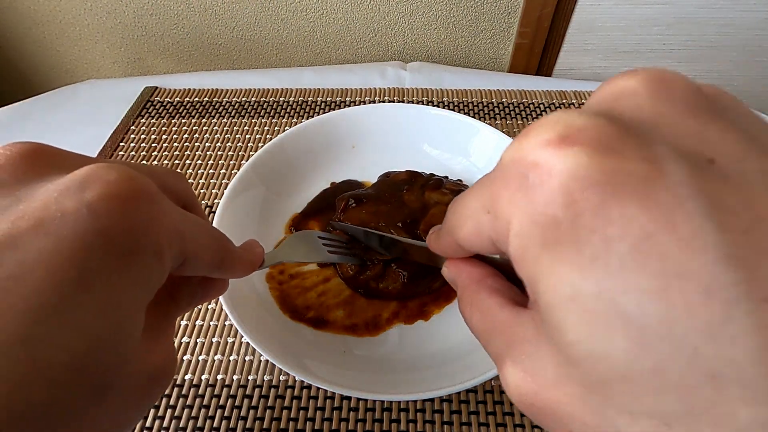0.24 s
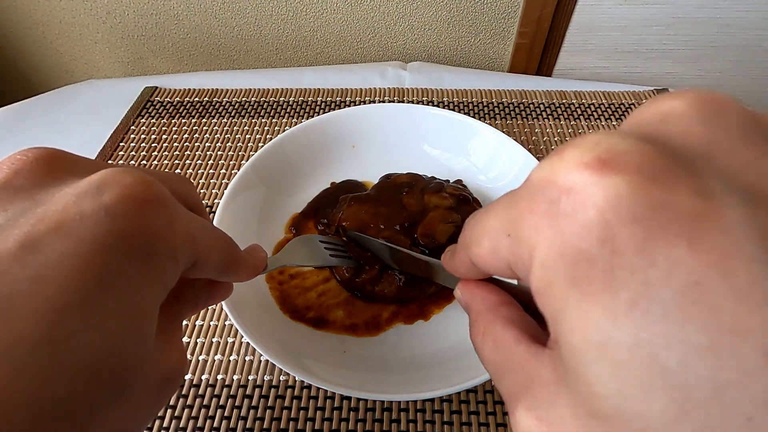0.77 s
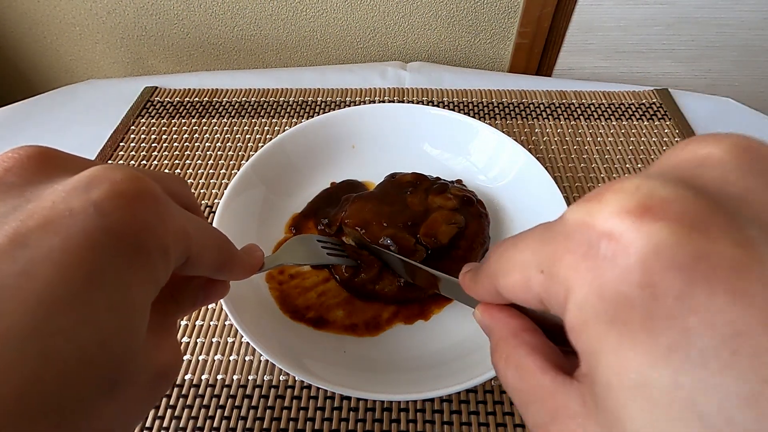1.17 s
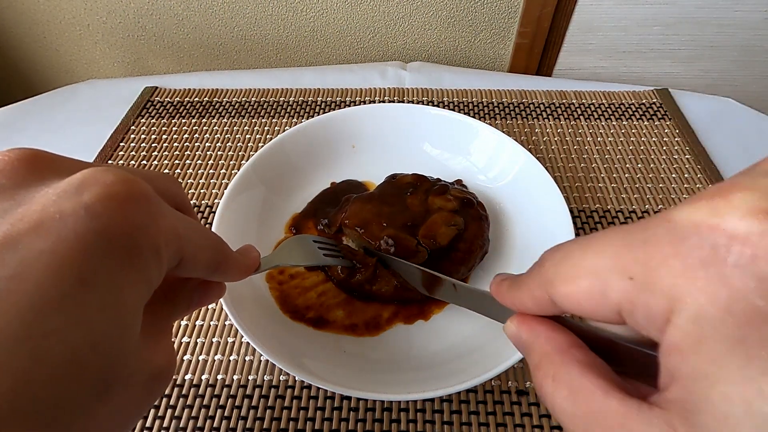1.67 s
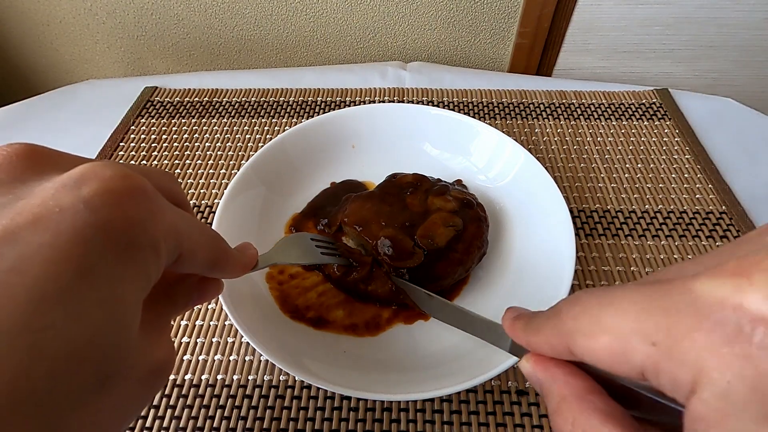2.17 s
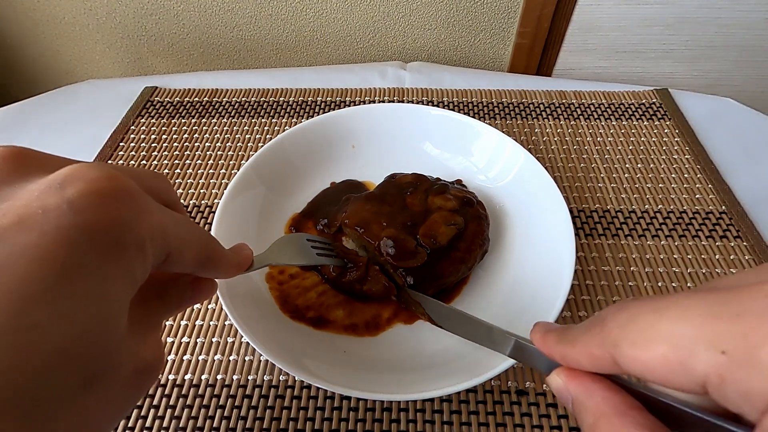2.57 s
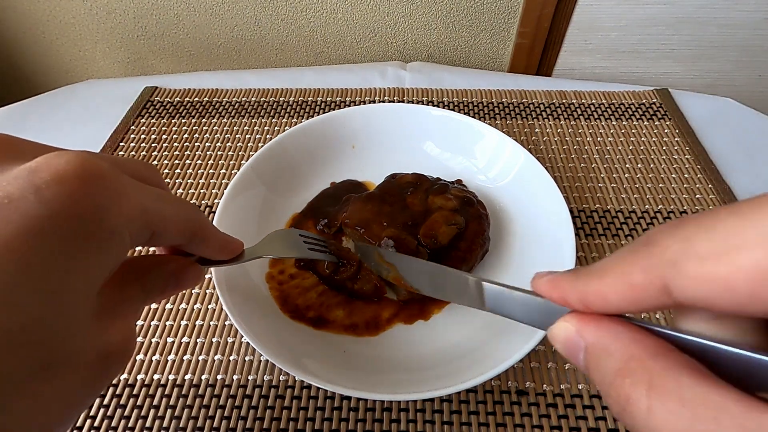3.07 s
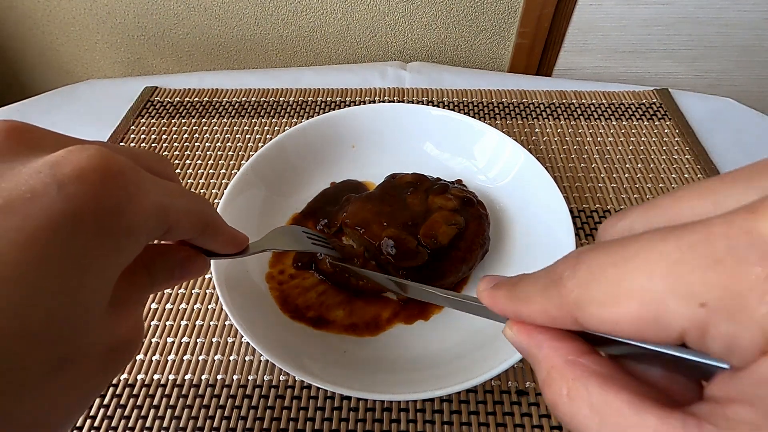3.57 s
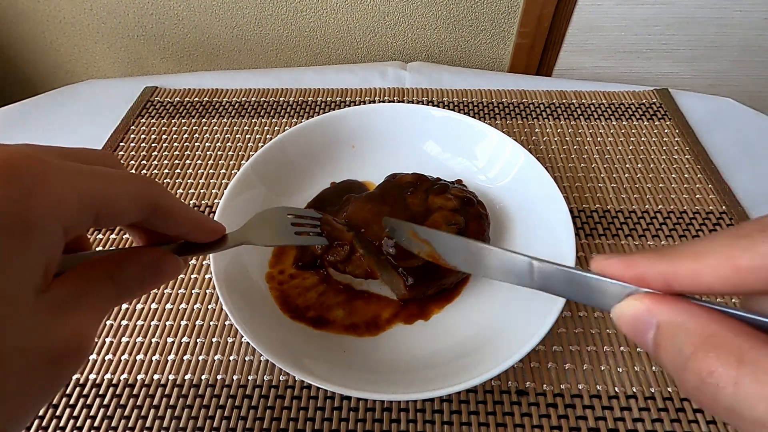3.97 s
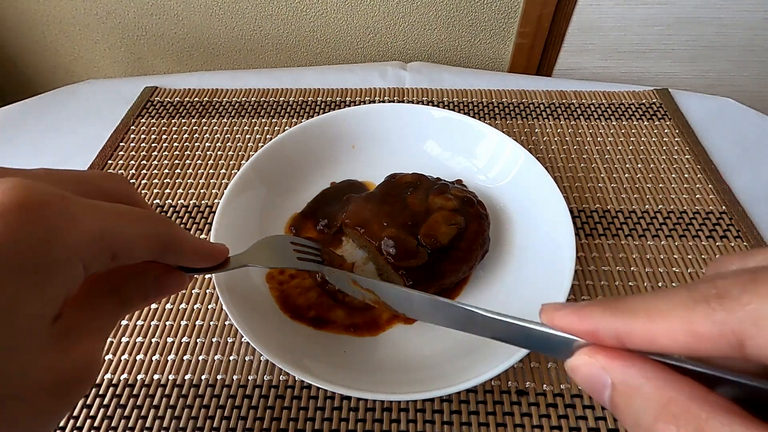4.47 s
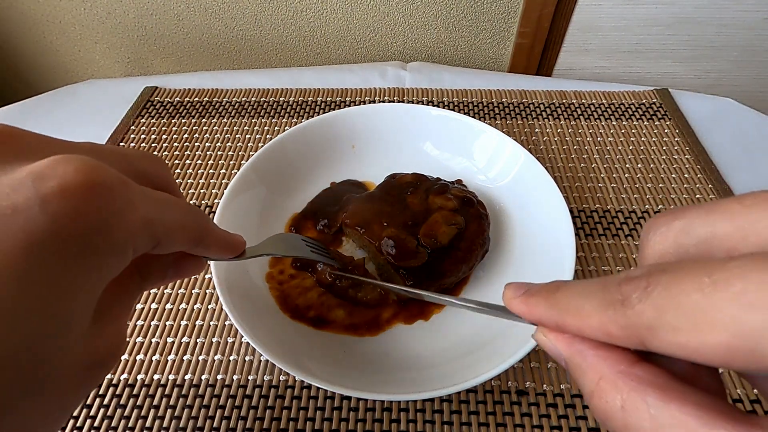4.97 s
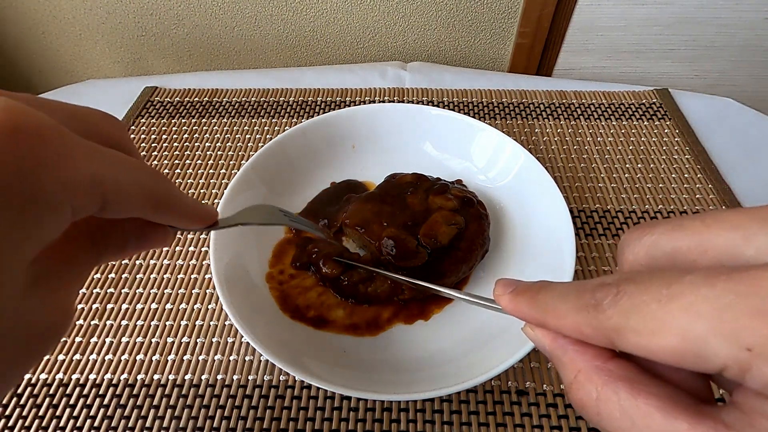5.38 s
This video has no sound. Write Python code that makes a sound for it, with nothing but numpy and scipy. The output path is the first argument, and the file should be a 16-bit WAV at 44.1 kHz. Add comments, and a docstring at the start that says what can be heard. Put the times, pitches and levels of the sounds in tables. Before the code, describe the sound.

Close up in a small quiet room, a table knife saws through sauced meat on a ceramic plate. Short uneven scrapes mix with wet clicks, sharp plate knocks and low table thumps for about three seconds. Small rough squeaks come near the end of the cut, then the knife and fork clink and slide softly, with longer quiet gaps.

```python
"""Knife and fork on a plate

Close by in a small quiet room, as at one microphone: a steel table knife saws sauced meat on a ceramic plate.
Strokes rasp on the glaze, crackle through wet fibres and sway the table; knocks strike plate resonances.
Rough squeaks glide in pitch; later knife and fork clink and slide along each other.
Rubbing is random tiny slips through resonators, blows are short bursts, and low sways are shaped noise."""
import sys
import numpy as np
from scipy import signal
from scipy.fft import rfft, irfft, next_fast_len
from scipy.io import wavfile
from scipy.ndimage import uniform_filter1d, minimum_filter1d

SR = 44100
rng = np.random.default_rng(int(sys.argv[2]) if len(sys.argv) > 2 else 0)


def to_wav(sig):
    """Store sig (one row per channel, or 1-D mono) as 16-bit WAV at the path in sys.argv[1].

    Samples outside -1..1 are clipped; the rate is SR.
    """
    pcm = np.clip(np.atleast_2d(sig), -1, 1) * 32767
    pcm = np.round(pcm).astype(np.int16)
    wavfile.write(sys.argv[1], SR, pcm.T)  # frames by channels


N = 248709
TIME = np.arange(N) / SR
BLOW_TIME = TIME[:SR]   # one second for each blow and its ring

# Event levels below are in dB before each layer's own trim.
# Strokes of the knife. Each row: start in seconds, length in seconds, swell from start to end in dB,
# rasp on the plate in dB, wet crackle in dB, table sway in dB, plate rocking in dB.
STROKES = [(0.15, 0.15, 12, -67, -72, -28.5, -61.5), (0.388, 0.014, -3, -56.5, -53.5, -34.5, -72.5),
           (0.562, .065, -2, -62, -61.5, -32.5, -57), (0.641, 0.068, -8.5, -51.5, -64, -32, -32),
           (0.745, .048, 7.5, -58.5, -64.5, -34, -43), (0.941, 0.08, 9.5, -56.5, -61.5, -32, -32),
           (1.057, 0.052, 10, -51.5, -57, -26, -40), (1.28, 0.082, 8, -50, -54, -25, -30.5),
           (1.354, 0.12, -6.5, -49.5, -58, -26, -50), (1.495, 0.032, 3.5, -70, -70, -29.5, -51),
           (1.62, 0.05, 16, -60, -51, -46, -43.5), (1.678, 0.1, -11.5, -47.5, -57.5, -34.5, -36),
           (1.933, 0.0611, 4, -54.5, -54, -35, -45), (2.035, 0.034, 1, -53, -54.5, -33, -47.5),
           (2.253, .045, -0.5, -75, -66, -44, -60), (2.311, .040, 1, -72, -83, -34.5, -49),
           (2.371, .020, 0, -87, -65.5, -45, -67.5), (2.551, 0.098, -8.5, -68, -75, -30, -50.5),
           (2.729, 0.034, -7.5, -60, -81, -40.5, -47), (2.798, 0.049, -3, -75, -79, -31, -58),
           (2.921, 0.046, -7, -48, -60, -23, -31.5)]
# Light pushes on the table as the hands shift. Each row: start in seconds, length in seconds,
# swell in dB, level in dB.
NUDGES = [(0.0, 0.019, 2.5, -40), (3.355, 0.094, -13, -47), (3.545, 0.032, 3, -60.5),
          (4.031, 0.015, -1, -49), (4.163, 0.1, -3.5, -60), (4.787, 0.034, -0.5, -47),
          (4.872, 0.088, 5, -52.5), (5.233, 0.072, -12.5, -45), (5.538, 0.017, 0, -44.5)]
# The plate is shoved against the table. Each row: time in seconds, level in dB.
THUMPS = [(0.641, -14), (0.874, -37.5), (1.019, -15), (1.355, -31), (1.676, -24), (1.968, -19),
          (2.693, -36.5), (2.913, -23.5), (5.224, -36)]
# Weight of the arms on the table. Each row: time in seconds, level in dB.
LEANING = [(0.0, -63.5), (0.35, -48), (0.66, -41.5), (1.6, -41), (2.08, -34.5), (2.24, -44), (2.95, -42.5),
           (3.25, -63), (4.4, -76), (5.64, -68)]
# Fibres and sauce snap. Each row: time in seconds, peak level in dB, pitch in Hz.
SNAPS = [(0.097, -58.5, 7300), (0.2496, -53.5, 7850), (0.3105, -49.5, 7000), (0.3357, -54, 6740),
         (0.5214, -46, 7400), (0.5347, -47.5, 7350), (0.6005, -47.5, 7000), (0.9285, -54.5, 6090),
         (1.2312, -58.5, 4970), (1.286, -34, 7250), (1.296, -39, 6880), (1.626, -44, 6670),
         (1.9078, -53.5, 4800), (1.997, -57.5, 7300), (2.2777, -49, 7700), (2.5217, -46.5, 6930),
         (2.546, -48, 5545), (5.359, -54, 7560), (5.3892, -55.5, 5400)]
# Blade on plate. Each row: time in seconds, then level in dB of the low, middle, upper middle and
# high resonances.
KNOCKS = [(0.636, -32, -40.5, -36, -34), (0.869, -56.5, -56, -79, -59), (0.946, -57.5, -56.5, -78, -64),
          (1.016, -43.5, -39, -58, -55), (1.073, -54, -51, -66.5, -52.5), (1.2711, -52, -48.5, -62, -50.5),
          (1.3491, -27.5, -22.5, -28, -26.5), (1.453, -59, -50, -61, -55), (1.4611, -66, -46.5, -61.5, -52),
          (1.674, -28, -25.5, -31.5, -31.5), (2.302, -56.5, -55.5, -66, -46),
          (2.6909, -52.5, -44, -73.5, -82), (2.7171, -54, -47.5, -86, -78),
          (2.9093, -32.5, -17.5, -40, -33), (5.2154, -60.5, -55, -71, -62.5)]
# Thick fibres tear. Each row: start in seconds, length in seconds, swell in dB, level in dB.
TEARS = [(0.743, 0.039, 18.5, -65.5), (0.94, 0.087, 6, -55.5), (1.04, 0.056, 3.5, -59),
         (4.831, 0.031, 2, -61.5)]
# The tip sticks and slips. Each row: loudest moment in seconds, rise in seconds, fall in seconds,
# pitch at that moment in Hz, glide in octaves per second, level in dB.
SQUEAKS = [(2.560, 0.0035, 0.012, 3094, -4.5, -53), (2.620, 0.0073, 0.0028, 3060, -5, -57.5),
           (2.640, .012, 0.018, 3000, 3.5, -58), (2.742, 0.0082, 0.0077, 3040, 5, -45.5),
           (2.837, .011, 0.0046, 3050, -5, -50), (2.900, .002, 0.0037, 3094, -6, -51.5),
           (3.876, 0.0034, 0.009, 3620, -6, -62), (3.876, 0.0055, .007, 2720, -2, -61),
           (3.913, 0.018, 0.011, 2540, -1, -55), (4.847, 0.019, 0.013, 4240, 1, -50.5)]
# Knife on fork. Each row: time in seconds, then level in dB of the low, middle, upper middle and
# high resonances.
CLINKS = [(3.3385, -48, -59.5, -57, -52.5), (3.533, -63, -68, -63, -57), (3.8473, -61.5, -58.5, -67, -48.5),
          (4.7709, -48, -47, -49.5, -53), (4.825, -62, -65, -56, -78), (5.1821, -57, -58, -62, -48)]
# The blade slides along the fork. Each row: start in seconds, length in seconds, swell in dB,
# steel ring in dB, rasp on the plate in dB.
SLIDES = [(3.376, 0.03, -0.5, -57.5, -57), (3.53, .012, 7, -52.5, -64), (3.859, 0.022, -8.5, -60.5, -72),
          (3.891, 0.031, 12, -55, -80), (4.823, 0.04, 5, -60, -50), (4.906, 0.0034, -4, -69, -56.5),
          (4.947, 0.0063, -11, -75, -67), (5.27, 0.13, 7, -70, -72.5)]
# The blade slips off the last tine. One row: time in seconds, level in dB.
SLIP_OFF = (3.920, -54.5)

# Damped resonances of plate and blade. Each row: pitch in Hz, width in Hz of each resonator pass,
# level when struck in dB, level when rubbed in dB.
PLATE = [(700, 410, -10, -12), (1298, 350, -2.5, 2), (1703, 380, -3, 3.5), (2320, 520, -19, -3),
         (2974, 260, 9, -1.5), (3250, 240, 5, -4), (3494, 323, 0.5, -10.5), (3870, 470, -6.5, -16.5),
         (4332, 650, -9.5, -10), (5572, 650, -12, -16), (6120, 360, -5, -14), (7280, 540, -2, -14),
         (8586, 330, -24, -28), (11591, 650, -27, -35)]
PLATE_STRUCK = [(hz, width, struck_db) for hz, width, struck_db, _ in PLATE]
PLATE_RUBBED = [(hz, width, rubbed_db) for hz, width, _, rubbed_db in PLATE]
# Resonances of knife against fork. Each row: pitch in Hz, width in Hz of each pass, level in dB.
STEEL = [(1210, 370, -12), (1820, 300, -12), (2560, 700, -12), (3330, 400, -15), (4120, 410, -8.5),
         (4820, 420, -1), (5360, 260, -0.5), (5860, 140, -1), (6550, 950, 0), (7490, 560, 5),
         (8240, 180, -11.5), (9090, 810, -11.5), (10650, 680, -13), (11600, 550, -15), (12780, 500, -21),
         (13280, 440, -19)]
# Resonances at which wet fibres click. Each row: pitch in Hz, width in Hz of each pass, level in dB.
WET = [(2800, 500, -6), (5020, 430, -5), (6274, 800, -6), (7280, 820, 0), (8030, 420, -11.5),
       (10200, 1740, -23), (12606, 1500, -29)]
# Limits of the four resonance groups of a blow. Each row: lowest pitch in Hz, highest pitch in Hz.
RING_BANDS_HZ = [(500, 2400), (2400, 3700), (3700, 5000), (5000, 15000)]
# Free ringing of the plate. Each row: pitch in Hz, level in dB, t60 in seconds.
PLATE_RING = [(216, -4.5, 1), (657, -14, 0.86), (1280, -11, .13), (1637, -2, .18), (2900, -5.5, .15),
              (3192, -2.5, 0.15), (3370, -5, 0.24), (3870, -11, .19), (4210, -17, .18), (5120, -19, .18),
              (5502, -15.5, .19), (5840, -18.5, .17), (7305, -21, .18), (11420, -30.5, 0.11)]
# Free ringing of the knife. Each row: pitch in Hz, level in dB, t60 in seconds.
STEEL_RING = [(2266, -12, .08), (4554, -9, .09), (5250, -8, .06), (5780, 0, .09), (7480, -20, .25),
              (7560, -2, .07), (9260, -19, .12), (11400, -17, .06), (13520, -20, .04)]
# Table with the plate on it. Each row: pitch in Hz, level in dB, t60 in seconds.
TABLE = [(96.88, -1.5, 0.22), (102, 2, 0.11), (126.25, -1.5, 0.15), (218.3, -16.5, 0.085),
         (217.7, -28.5, 1), (219.8, -12, 0.086)]
# Spectrum of the swaying table. Each row: frequency in Hz, relative level in dB per Hz.
SWAY = [(35, -37.5), (55, -11), (70, -11.5), (86, 5.5), (105, -16.5), (120, -10), (136, -18), (160, -29.5),
        (200, -39)]
# Spectrum of the rocking plate. Each row: frequency in Hz, relative level in dB per Hz.
ROCKING = [(100, -25), (122, -8), (136, 1.5), (148, -5.5), (165, -24.5), (188, -9.5), (205, -6.5),
           (216, 1.5), (229, -6.5), (241, -5), (275, -29.5), (350, -44.5), (600, -46.5), (1000, -62)]
# Spectrum of the room at rest. Each row: frequency in Hz, relative level in dB per Hz.
ROOM_TONE = [(25, -0.5), (62, 0.5), (100, -13), (150, -9.5), (200, -2.5), (310, -14.5), (420, -14.5),
             (700, -22.5), (1250, -13), (2000, -21), (4000, -33), (7700, -36.5), (9500, -46.5),
             (14500, -46)]

CUT_THROUGH_S = 2.8    # the piece is cut through
ROOM_TONE_DB = -66.5
HUM_DB = -16           # relative to the rocking that drives it
SWAY_EVEN_S = .035
WANDER_DB = 3.5        # spread of each resonance as the contact travels
FADE_SHAPE = .8        # below 1, a fade is quick at first and then lingers
CEILING = .28          # limiter threshold, amplitude
CUTOFF_HZ = 15500


def from_db(db):
    """Decibels to gain."""
    return 10 ** (np.asarray(db) / 20)


def rms_one(x):
    """Scale to rms 1."""
    return x / np.sqrt(np.mean(x ** 2) + 1e-20)


def add(out, s, x):
    """Mix x into out from time s."""
    i = max(round(s * SR), 0)
    out[i:i + len(x)] += x[:N - i]


def power(x, seconds):
    """Running mean square."""
    return np.abs(uniform_filter1d(x ** 2, max(int(seconds * SR), 2))) + 1e-20


def evened(x, seconds):
    """Hold the slow level near 1 and keep the fine grain."""
    slow_power = uniform_filter1d(power(x, seconds), max(int(seconds * SR), 2))
    return x / np.sqrt(np.abs(slow_power))


def top_one(x):
    """Scale so that the loudest 3 ms have rms 1."""
    return x / np.sqrt(power(x, .003).max())


def band(x, low_hz, high_hz):
    """Causal band-pass."""
    sos = signal.butter(2, [low_hz, min(high_hz, .45 * SR)], "band", fs=SR, output="sos")
    return signal.sosfilt(sos, x + 1e-18)


def coloured(x, spectrum):
    """Give x a smooth spectrum, interpolated over log frequency."""
    hz, db = np.transpose(spectrum)
    size = next_fast_len(N)
    bins = np.maximum(np.fft.rfftfreq(size, 1 / SR), 1)
    gain = from_db(np.interp(np.log(bins), np.log(hz), db, left=-80, right=-120))
    return irfft(rfft(x, size) * gain, size)[:N]


def mode(x, hz, width_hz):
    """One damped, steep-sided resonance: two equal passes, each at least 160 Hz wide."""
    r = np.exp(-np.pi * max(width_hz, 160) / SR)
    edge = (1 - r * r) / 2
    section = [edge, 0, -edge, 1, -2 * r * np.cos(2 * np.pi * hz / SR), r * r]
    return signal.sosfilt([section, section], x + 1e-18)


def ringing(modes):
    """Decaying sines; every blow shares its energy out a little differently."""
    hz, db, t60 = np.transpose(modes)[:, :, None]
    strength = from_db(db + rng.standard_normal(db.shape))
    decay = np.exp(-np.log(1000) * BLOW_TIME / t60)
    return np.sum(strength * decay * np.sin(2 * np.pi * hz * BLOW_TIME), axis=0)


def grains(per_s, spread_db):
    """Random tiny slips, most small and a few large."""
    sizes = from_db(spread_db * np.minimum(rng.exponential(1, N), 4)) * rng.choice([-1, 1], N)
    return sizes * (rng.random(N) < per_s / SR)


def blow(modes, levels_db, contact_s, chatter):
    """A first touch and brief chatter excite resonances, with a level of its own for each pitch group."""
    t = BLOW_TIME[:SR // 20]
    force = chatter * rng.standard_normal(len(t)) * np.exp(-(t / contact_s) ** 4)
    force[0] += 1
    out = 0
    for level_db, (low, high) in zip(levels_db, RING_BANDS_HZ):
        group = 0
        for k, (hz, width_hz, db) in enumerate(modes):
            if low <= hz < high:
                # neighbours swing in opposite directions
                group = group + (-1) ** k * from_db(db) * top_one(mode(force, hz, width_hz))
        out = out + from_db(level_db) * top_one(group)
    return out


def rubbed(modes, per_s, spread_db, even_s, wander_db):
    """Every slip excites all modes; as the contact travels, now one and now another stands out."""
    slips = grains(per_s, spread_db)
    at = np.flatnonzero(slips)
    places = np.arange(0, TIME[-1] + 1, .03)   # a new coupling every 30 ms
    out = 0
    for hz, width_hz, db in modes:
        force = np.zeros(N)
        force[at] = slips[at] * rng.standard_normal(N)[at]
        wander = np.interp(TIME, places, rng.standard_normal(len(places)))
        coupling = from_db(wander_db * wander)
        out = out + from_db(db) * rms_one(mode(force * coupling, hz, width_hz))
    return evened(out, even_s)


def gestures(timing, db, attack_s, release_s, arch_db=0, lag_s=0):
    """Gain of hand movements: each sets in, swells or eases, arches up or down midway and dies away."""
    start, length, swell_db = timing
    t = TIME[::40, None]
    since = t - start - lag_s
    length = np.maximum(length, .002)
    along = np.clip(since / length, 0, 1) - .5   # -0.5 at the start, 0.5 at the end
    fade = np.maximum(-since, 0) / attack_s + np.maximum(since - length, 0) / release_s
    level_db = db + swell_db * along - arch_db * (2 * along) ** 2
    each = from_db(level_db) * np.exp(-fade ** FADE_SHAPE)
    return np.interp(TIME, t[:, 0], np.sqrt(np.sum(each ** 2, axis=1)))


def room_tone():
    """Steady noise with the spectrum of the quiet room."""
    return from_db(ROOM_TONE_DB) * rms_one(coloured(rng.standard_normal(N), ROOM_TONE))


def heave(level_db=-1, low_hz=17, high_hz=42):
    """The weight of the arms rocks the whole table: very low noise follows how they lean."""
    level = from_db(level_db + np.interp(TIME, *np.transpose(LEANING)))
    return level * evened(band(rng.standard_normal(N), low_hz, high_hz), 0.13)


def table(sway_db=-2.0, rocking_db=0.5, nudge_db=-2, thump_db=-2, push_s=0.007):
    """Strokes and nudges sway the table, strokes also rock the plate; hard shoves set both booming."""
    *timing, _, _, sways_db, rockings_db = np.transpose(STROKES)
    *nudge_timing, nudges_db = np.transpose(NUDGES)
    sway = gestures(timing, sways_db + sway_db, attack_s=0.0071, release_s=0.021, arch_db=3, lag_s=0.00398)
    sway += gestures(nudge_timing, nudges_db + nudge_db, attack_s=0.0089, release_s=0.029, arch_db=4.5)
    rocking = gestures(timing, rockings_db + rocking_db, attack_s=0.0074, release_s=0.028,
                       arch_db=2.5, lag_s=0.0032)
    plate = rocking * evened(coloured(rng.standard_normal(N), ROCKING), 0.051)
    swaying = sway * evened(coloured(rng.standard_normal(N), SWAY), SWAY_EVEN_S)
    out = swaying + plate + hum(plate)
    onset = 1 - np.exp(-(BLOW_TIME / push_s) ** 2)
    for s, db in THUMPS:
        add(out, s, -from_db(db + thump_db) * ringing(TABLE) * onset)
    return out


def hum(push, hz=216, t60=1.0):
    """The lowest mode of the plate, driven by its rocking, hums on from one stroke to the next."""
    r = np.exp(-np.log(1000) / (t60 * SR))
    ring = signal.lfilter([1], [1, -2 * r * np.cos(2 * np.pi * hz / SR), r * r], push)
    return from_db(HUM_DB) * np.std(push) * rms_one(ring)


def snaps(level_db=-4, decay_s=0.00077, width_hz=2000, body_db=-2):
    """Single wet clicks: a noise burst excites a pitch of its own and the shared wet resonances."""
    out, t = np.zeros(N), BLOW_TIME[:SR // 20]
    for s, peak_db, hz in SNAPS:
        burst = rng.standard_normal(len(t)) * np.exp(-t / decay_s)
        body = sum(from_db(db) * top_one(mode(burst, pitch, width)) for pitch, width, db in WET)
        click = top_one(mode(burst, hz, width_hz)) + from_db(body_db) * top_one(body)
        add(out, s, from_db(peak_db + level_db) * top_one(click))
    return out


def sauce(level_db=-74, per_s=110, spread_db=4):
    """The sauce ticks faintly around each stroke while the blade is in the meat."""
    stirred = gestures(np.transpose(STROKES)[:3], level_db, attack_s=0.031, release_s=.03)
    stirred = stirred * (TIME < CUT_THROUGH_S)
    ticks = grains(per_s, spread_db)
    wet = sum(from_db(db) * rms_one(mode(ticks, hz, width)) for hz, width, db in WET)
    return stirred * rms_one(wet)


def sawing(rasp_db=0, wet_db=-3.0):
    """Serrations catch on the glaze while wet fibres tear: two streams of slips through resonances."""
    *timing, rasps_db, wets_db, _, _ = np.transpose(STROKES)
    rasp = gestures(timing, rasps_db, attack_s=0.0055, release_s=0.0053, arch_db=-1.0)
    wet = gestures(timing, wets_db, attack_s=0.0035, release_s=.013, arch_db=-2.2)
    teeth = rubbed(PLATE_RUBBED, per_s=940, spread_db=2.0, even_s=0.024, wander_db=5.5)
    fibres = rubbed(WET, per_s=1000, spread_db=2, even_s=0.034, wander_db=WANDER_DB)
    return from_db(rasp_db) * rasp * teeth + from_db(wet_db) * wet * fibres


def knocks(level_db=2, ring_db=-24.0, contact_s=0.0035, chatter=0.48, held_t60=0.35):
    """The blade hits the plate; while it still presses through the meat it damps the ring that follows."""
    out = np.zeros(N)
    for s, *levels_db in KNOCKS:
        held = s < CUT_THROUGH_S
        damping = np.exp(-np.log(1000) * BLOW_TIME / held_t60 * held)
        add(out, s, from_db(level_db) * blow(PLATE_STRUCK, levels_db, contact_s, chatter))
        # the ring follows the middle group's level
        add(out, s, from_db(levels_db[1] + ring_db) * top_one(ringing(PLATE_RING)) * damping)
    return out


def tearing(level_db=-1, pitch_hz=760, width_hz=320):
    """Thick fibres give way in a dull rasp: slips through one low resonance."""
    *timing, tears_db = np.transpose(TEARS)
    level = gestures(timing, tears_db + level_db, attack_s=0.011, release_s=0.016)
    return level * evened(mode(grains(per_s=860, spread_db=1.5), pitch_hz, width_hz), 0.023)


def squeaks(level_db=0, jitter=0.075, jitter_hz=500, flutter=0.2, overtone_db=-14):
    """Stick and slip locks on to a resonance: a short, rough, gliding tone."""
    out = np.zeros(N)
    t = BLOW_TIME[:SR // 5] - .1   # zero at the loudest moment
    smooth = signal.butter(2, jitter_hz, fs=SR, output="sos")
    for s, rise_s, fall_s, hz, glide, db in SQUEAKS:
        wander = rms_one(signal.sosfilt(smooth, rng.standard_normal(len(t))))
        grip = rms_one(signal.sosfilt(smooth, rng.standard_normal(len(t))))
        pitch_hz = hz * 2 ** (glide * t) * (1 + jitter * wander)
        phase = 2 * np.pi * np.cumsum(pitch_hz) / SR
        tone = np.sin(phase) + from_db(overtone_db) * np.sin(2 * phase)
        rough_tone = tone * (1 + flutter * grip)
        swell = np.exp(-(t / np.where(t < 0, rise_s, fall_s)) ** 2)
        add(out, s + t[0], from_db(db + level_db) * rms_one(rough_tone) * swell)
    return out


def clinks(level_db=0, contact_s=0.0042, chatter=0.14):
    """Knife and fork touch and damp each other; only when the blade slips off does it ring freely."""
    out = np.zeros(N)
    for s, *levels_db in CLINKS:
        add(out, s, from_db(level_db) * blow(STEEL, levels_db, contact_s, chatter))
    s, db = SLIP_OFF
    add(out, s, from_db(db) * top_one(ringing(STEEL_RING)))
    return out


def slides(steel_db=0, rasp_db=0):
    """The blade is drawn through the tines and drags over the plate: slips excite steel and ceramic."""
    *timing, steels_db, rasps_db = np.transpose(SLIDES)
    steel = gestures(timing, steels_db, attack_s=0.0068, release_s=0.0034, arch_db=-1.5)
    rasp = gestures(timing, rasps_db, attack_s=0.014, release_s=0.004, arch_db=2.5)
    on_fork = rubbed(STEEL, per_s=1500, spread_db=3.5, even_s=0.017, wander_db=WANDER_DB)
    on_plate = rubbed(PLATE_RUBBED, per_s=1700, spread_db=1.5, even_s=0.027, wander_db=WANDER_DB)
    return from_db(steel_db) * steel * on_fork + from_db(rasp_db) * rasp * on_plate


def room(x, wet_db=-13, t60=0.23, gap_s=0.0018, dull_hz=11000):
    """Dense reflections of a small furnished room: decaying noise after a short gap."""
    decay = np.exp(-np.log(1000) * BLOW_TIME / t60)
    tail = rng.standard_normal(SR) * decay * (BLOW_TIME > gap_s)
    tail = band(tail / np.sqrt(np.sum(tail ** 2)), 410, dull_hz)
    return x + from_db(wet_db) * signal.fftconvolve(x, tail)[:N]


def scene():
    """Cutlery with its reflections, plate and table over the hush of the room."""
    cutlery = knocks() + clinks() + snaps() + sawing() + sauce() + tearing() + squeaks() + slides()
    hush = room_tone()
    return (room(cutlery) + table() + heave() + hush)[None]


def record(dry):
    """A fast limiter holds the hardest knocks down, and the top is cut."""
    allowed = np.minimum(1, CEILING / (np.abs(dry) + 1e-9))
    gain = uniform_filter1d(minimum_filter1d(allowed, size=131), size=131)   # about 3 ms
    top_cut = signal.cheby2(12, 70, CUTOFF_HZ, fs=SR, output="sos")
    return signal.sosfilt(top_cut, dry * gain)


dry = scene()
out = record(dry)
to_wav(out)
```